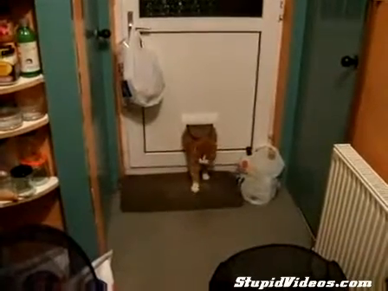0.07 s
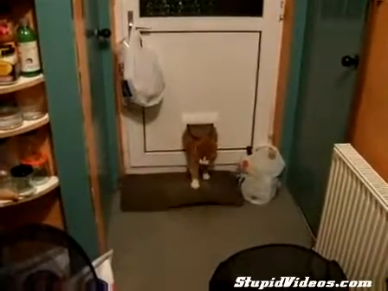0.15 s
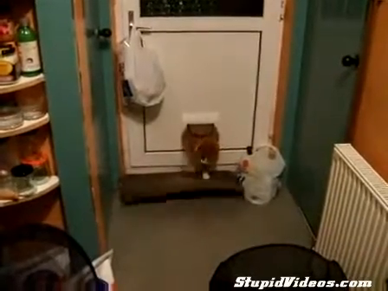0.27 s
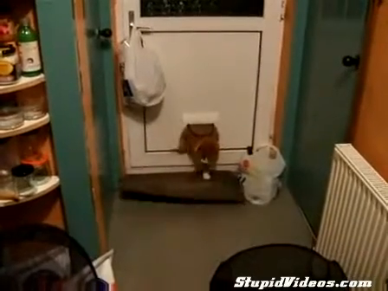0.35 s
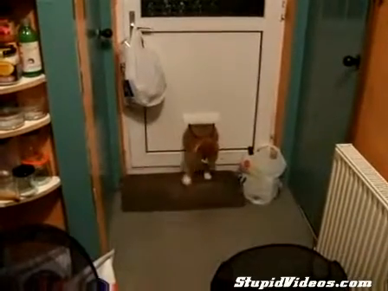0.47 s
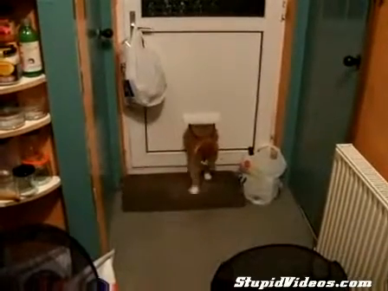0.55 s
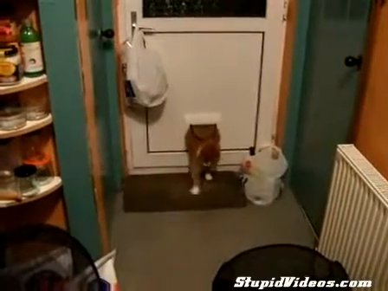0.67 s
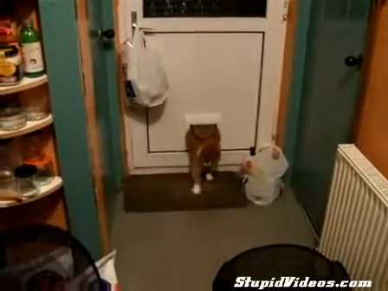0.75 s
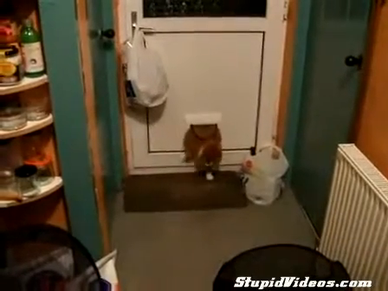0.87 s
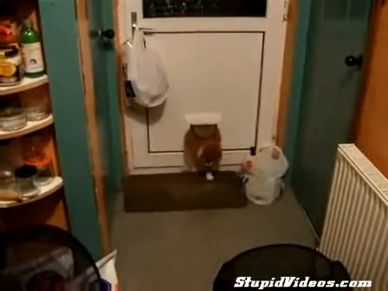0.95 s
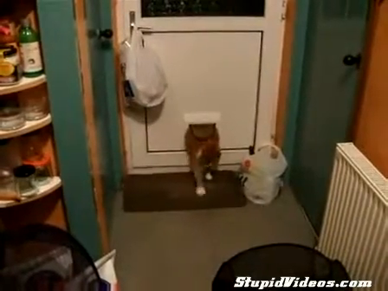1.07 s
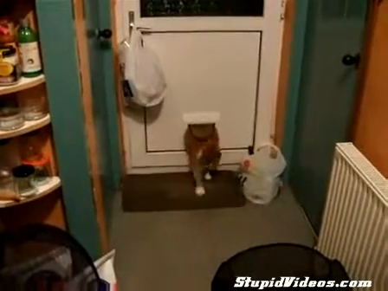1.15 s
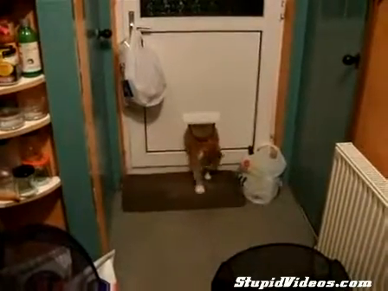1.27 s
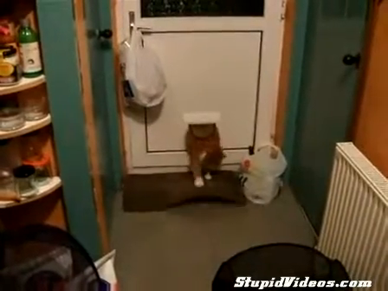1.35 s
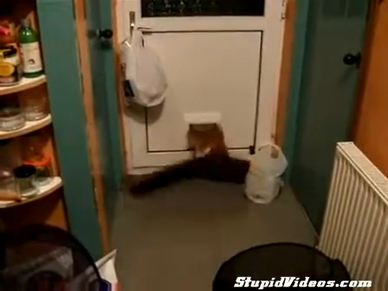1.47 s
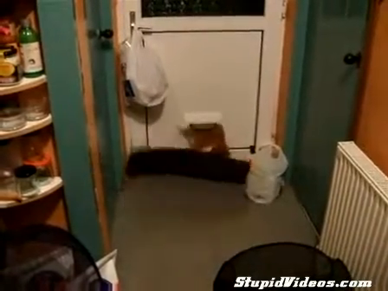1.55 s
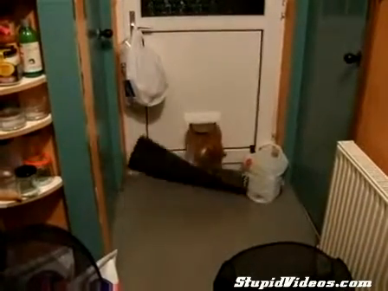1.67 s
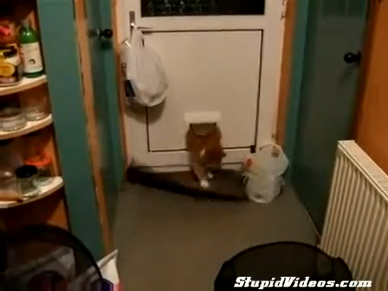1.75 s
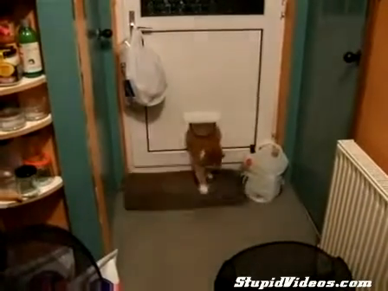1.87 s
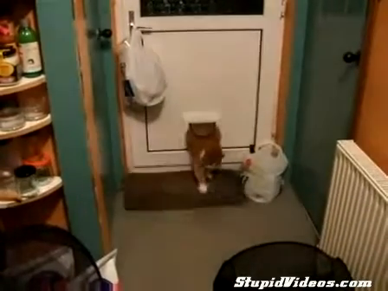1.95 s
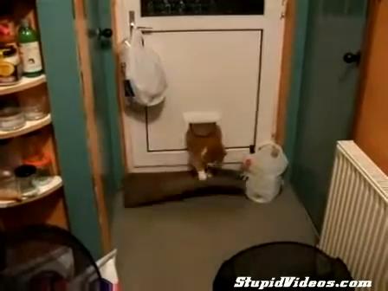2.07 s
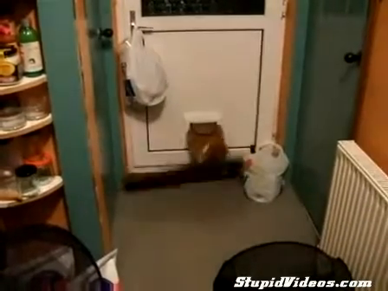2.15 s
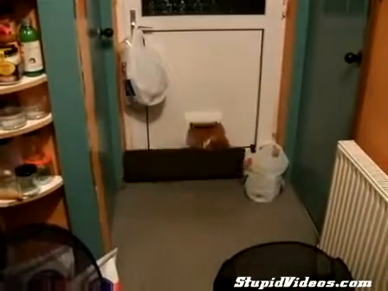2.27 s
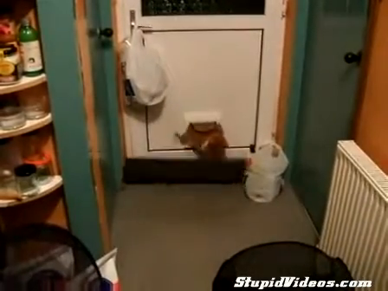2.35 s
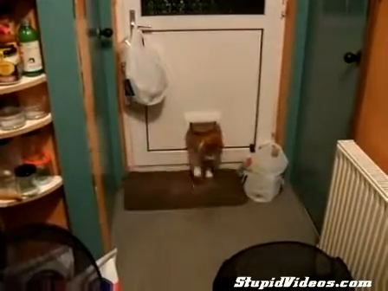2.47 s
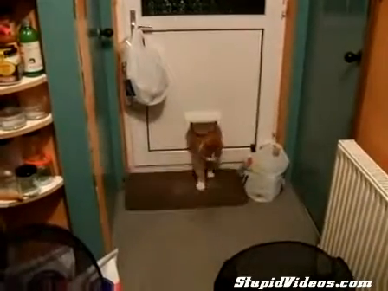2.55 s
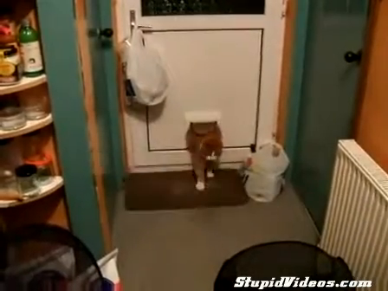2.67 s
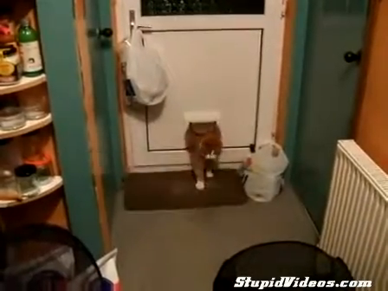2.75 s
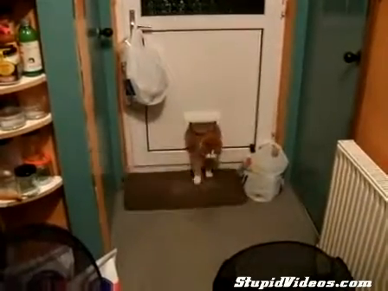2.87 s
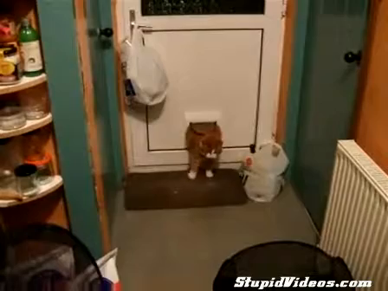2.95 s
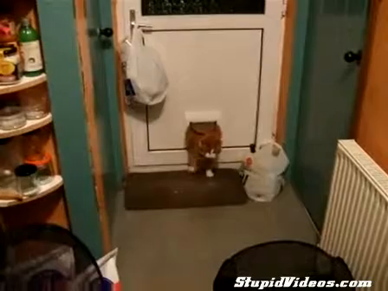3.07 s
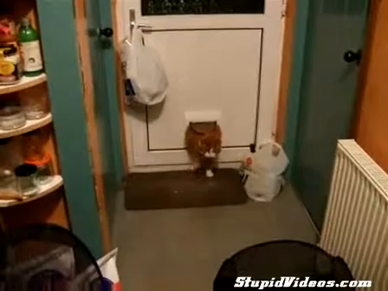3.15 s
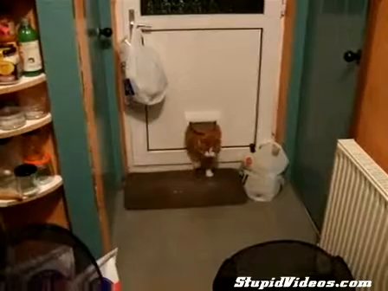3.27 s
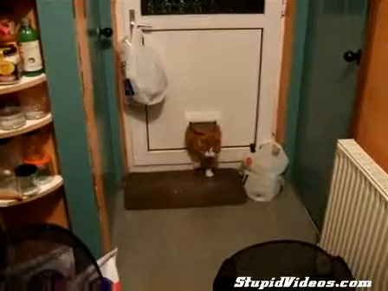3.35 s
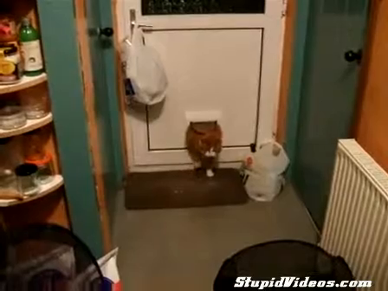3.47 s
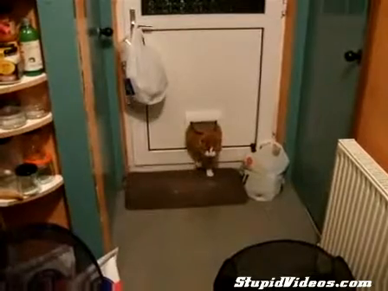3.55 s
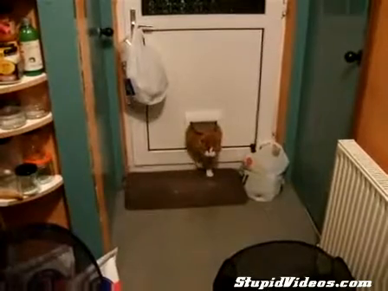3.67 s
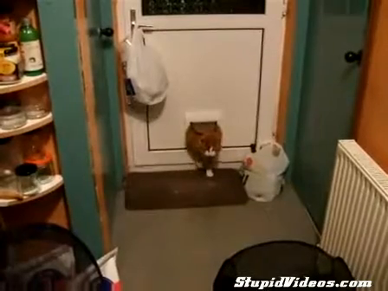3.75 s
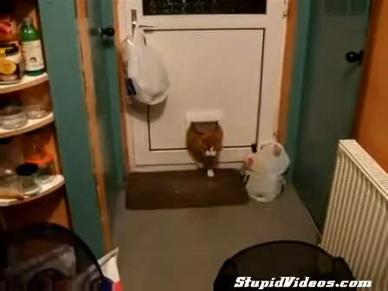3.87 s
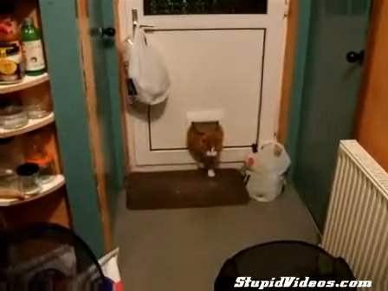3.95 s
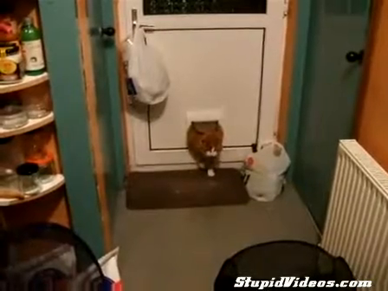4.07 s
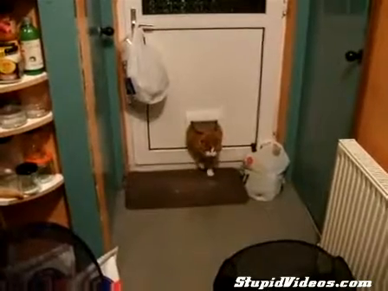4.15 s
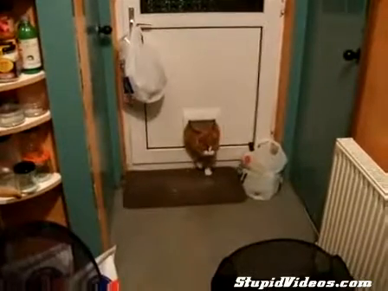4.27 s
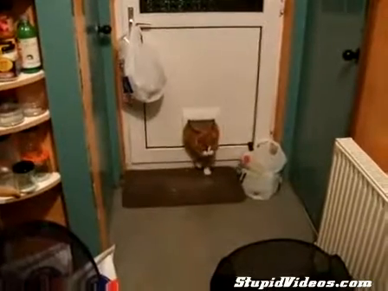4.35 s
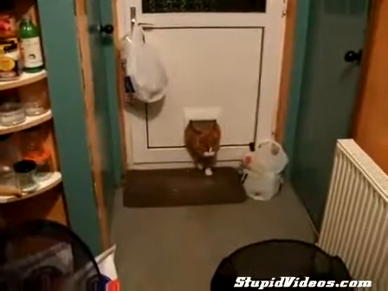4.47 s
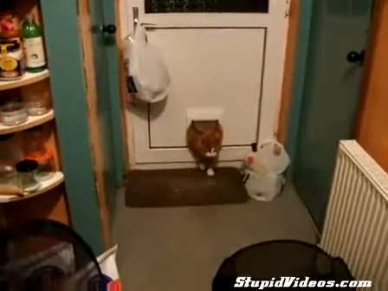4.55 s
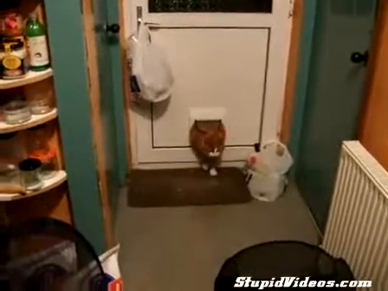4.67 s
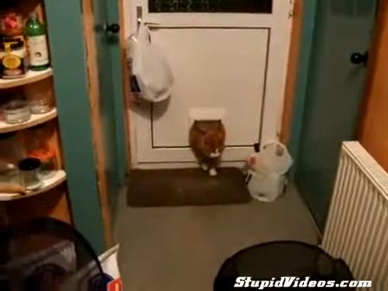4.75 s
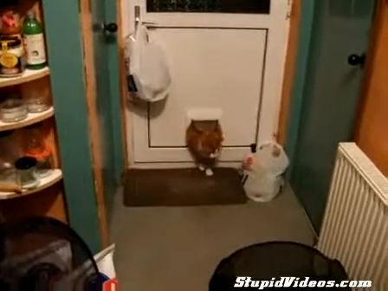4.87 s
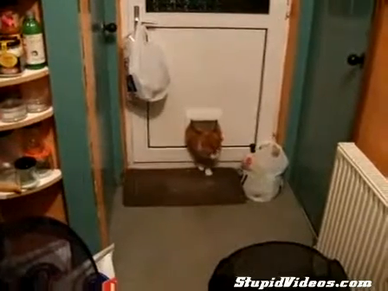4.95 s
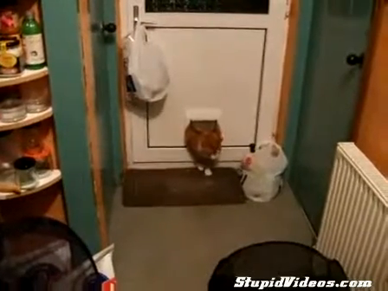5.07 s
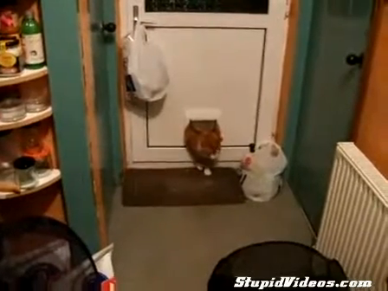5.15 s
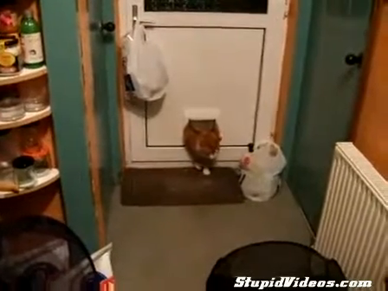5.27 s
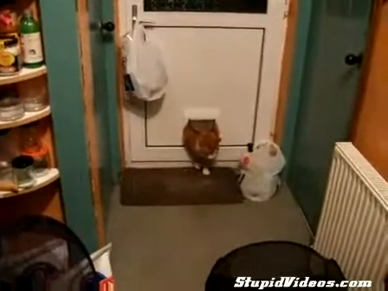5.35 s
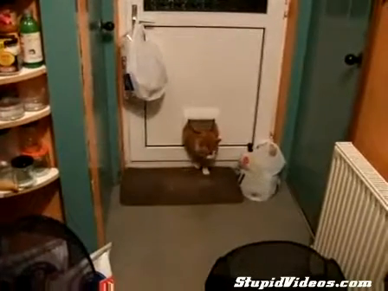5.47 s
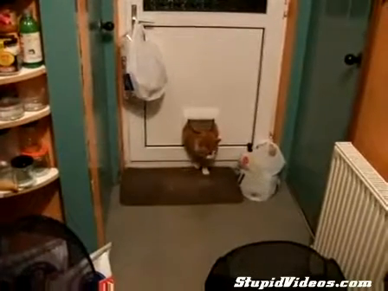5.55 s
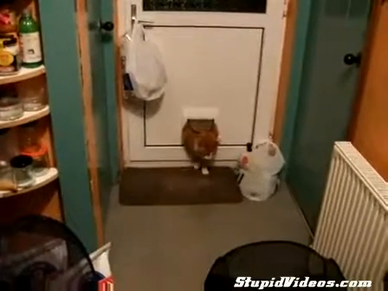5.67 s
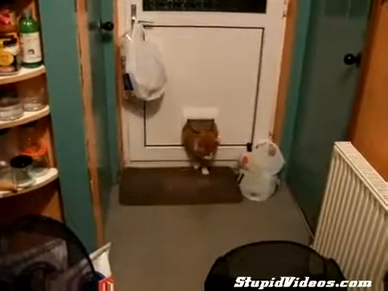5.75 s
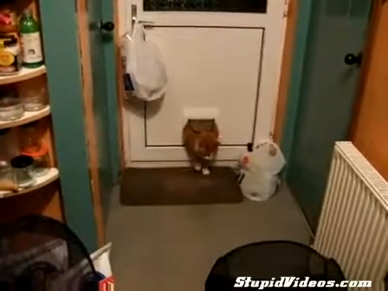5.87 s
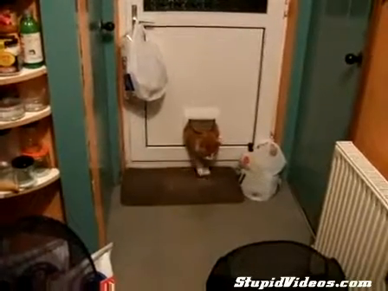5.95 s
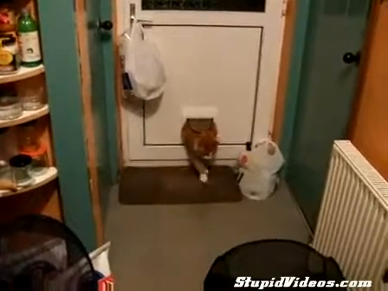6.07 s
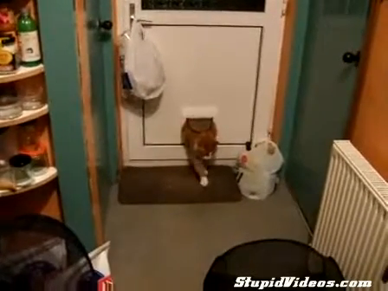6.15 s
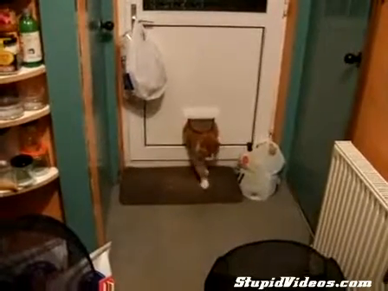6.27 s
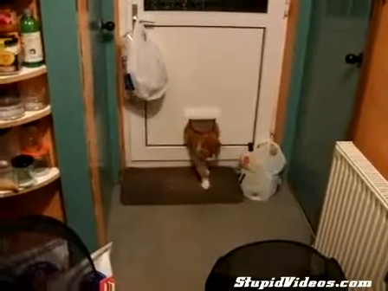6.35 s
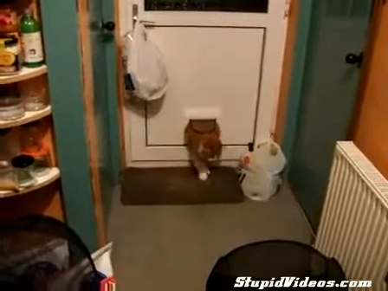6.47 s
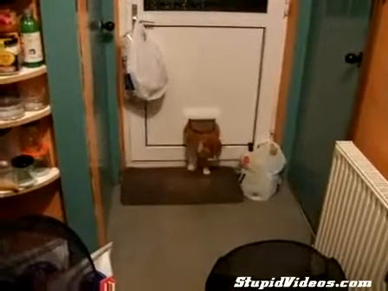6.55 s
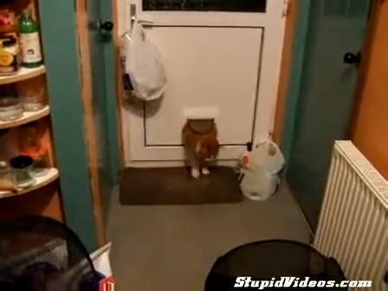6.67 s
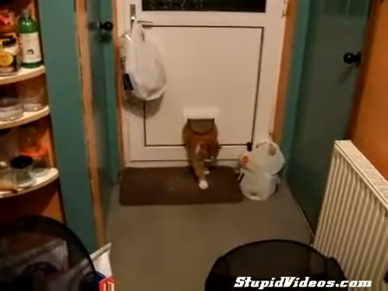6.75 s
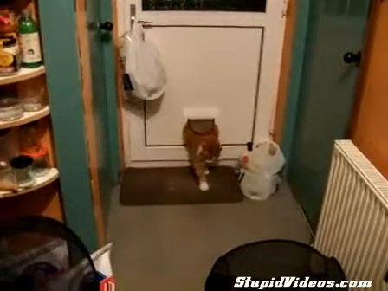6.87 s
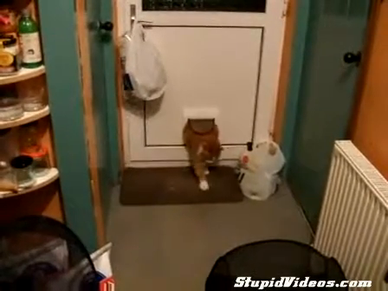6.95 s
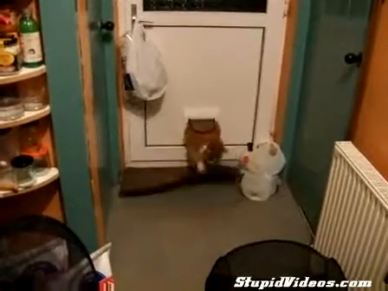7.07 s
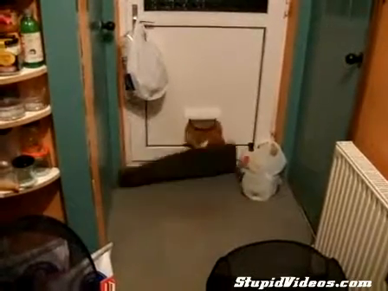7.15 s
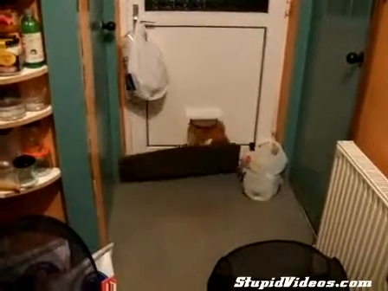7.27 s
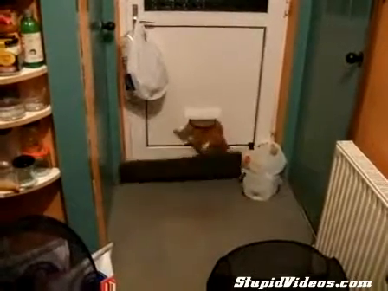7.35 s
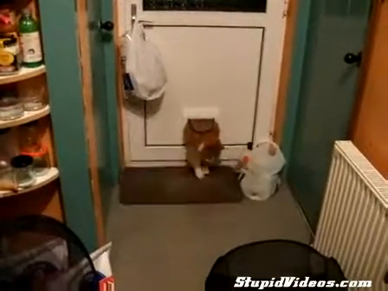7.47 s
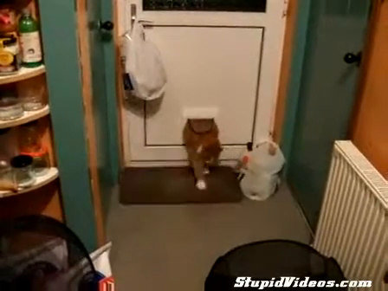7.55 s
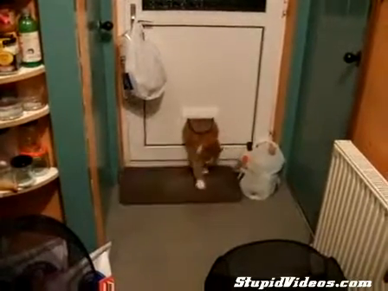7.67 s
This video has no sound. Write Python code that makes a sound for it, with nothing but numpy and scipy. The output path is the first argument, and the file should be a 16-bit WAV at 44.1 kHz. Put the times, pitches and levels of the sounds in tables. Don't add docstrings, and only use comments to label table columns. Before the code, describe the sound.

A cheap camera's soft hiss and low wavering hum run throughout, in a small hard hallway with a short ring. From 0.2 to 0.6 s a plastic flap clacks sharply against a hollow door, with jammed fur shoves and gritty mat scraping. Softer body thuds follow at 0.8 to 1.3 s. From 1.4 s the struggle thickens; a hard clack near 1.8 s sets loose metal jingling until a strong shove at 2.0 s. More clacks, bumps and bristly drags come at 2.2 to 2.7 s, the last ones loud, with tiny ticks near 2.9 s. Then a lull: a faint thud at 4.2 s, one thin falling mew to 4.8 s, and barely audible ticks. Two clacks at 6.6 s and dull thuds from 6.9 s restart it; dense knocks and scrapes from 7.2 s end with a very loud blow and high metallic buzz at 7.6 s.

```python
import sys
import numpy as np
from scipy import signal
from scipy.fft import rfft, irfft
from scipy.io import wavfile
from scipy.ndimage import uniform_filter1d

SR = 44100
rng = np.random.default_rng(int(sys.argv[2]) if len(sys.argv) > 2 else 0)


def magnitude_from_level(level_db):
    exponent = np.asarray(level_db, float) / 20
    return 10 ** exponent


def unload_audio(sound):
    columns = np.transpose(np.atleast_2d(sound))
    steps = np.round(np.clip(columns, -1, 1) * 32767)
    wavfile.write(sys.argv[1], SR, steps.astype(np.int16))


N = 340011
T = np.arange(N) / SR

# frequency in Hz, level in dB, t60 in s.
PANEL_MODES = [(240, -2, 0.02), (293.7, 0.5, 0.072), (354, 2, 0.035), (414, -1, 0.058), (476, -3.5, 0.0075),
               (528, -1.5, 0.048), (600, -1.5, 0.027), (680, -7.5, 0.02), (775, 4.5, 0.028),
               (857, 1.5, 0.034), (913, 5, 0.025), (1056, 3, 0.041), (1223, -6.5, 0.056),
               (1308, 0.5, 0.027), (1440, -3.5, 0.023), (1694, 7, 0.011), (1890, -18.5, 0.019),
               (1960, -0.5, 0.006), (2440, -4.5, 0.017)]
# frequency in Hz, level in dB, t60 in s.
DOOR_MODES = [(58.5, -10, 0.052), (77, -7.5, 0.069), (96.4, -0.5, 0.18), (109, -13.5, 0.03),
              (146.5, 4.5, 0.14), (173, 3, 0.23), (210, 3.5, 0.094), (235, -13, .03)]


def clacks():
    # start in s, panel peak in dB, panel pitch in Hz, crack over panel in dB.
    clack_rows = [(0.202, -26.5, 833, -1.5), (0.304, -39, 519, -5), (0.342, -18, 408, -3),
                  (0.506, -16.5, 796, -7.5), (0.605, -20, 744, 13.5), (1.403, -33, 820, -5.5),
                  (1.469, -19, 528, -11), (1.817, -10, 775, 4), (2.217, -29.5, 528, -2),
                  (2.397, -17.5, 272, -32), (2.419, -13, 313, -5.5), (2.64, -10.5, 585, -4.5),
                  (2.903, -39.5, 830, 1.5), (2.977, -35.5, 726, -0.3), (6.599, -21, 650, -5.5),
                  (6.623, -18.5, 600, -4), (7.185, -29.5, 545, -0.5), (7.443, -10, 346, -5.5)]
    thump_db, contact_ms = -37.5, 3.33
    blows = [(*row, thump_db, contact_ms) for row in clack_rows]
    return knocks(blows, rise=1.0, early_s=0.001215)


def thuds():
    # start in s, panel peak in dB, panel pitch in Hz, crack over panel in dB,
    # door thump over panel in dB.
    thud_rows = [(0.773, -29, 348, -2, -1.5), (1.039, -25.5, 1260, -2, -12), (1.157, -38, 388, -24, -1),
                 (1.188, -19.5, 399, -6, -2.5), (1.256, -28, 330, -5, -5.5), (1.732, -23.5, 430, -14, 4),
                 (1.759, -20, 297, -26, 2.5), (1.785, -19.5, 322, -29, -19), (2.273, -30, 315, 0.5, -16),
                 (2.303, -35, 900, 1.5, -11), (4.215, -38.5, 330, -28, -13), (6.859, -23, 336, -14, -10.5),
                 (6.938, -26.5, 350, -8, -3), (7.108, -36, 830, -11, -18), (7.287, -16.5, 330, -36, -3.5),
                 (7.538, -16.5, 338, -8, -8.5), (7.636, -9.5, 514, -0.5, -16)]
    contact_ms = 4.4
    blows = [(*row, contact_ms) for row in thud_rows]
    return knocks(blows, rise=0.56, early_s=0.001202)


def shoves():
    # start in s, panel peak in dB, panel pitch in Hz, crack over panel in dB, contact in ms.
    shove_rows = [(0.365, -26.5, 397, -30, 7), (0.403, -22, 405, -2.5, 12), (0.557, -20.5, 543, -2.5, 11),
                  (0.921, -24, 624, -1.5, 16.5), (1.555, -31.5, 302, 3, 4.2), (1.672, -17.5, 326, -0.5, 7),
                  (1.693, -15.5, 920, -1, 6.1), (1.989, -11, 1143, 3.5, 6.3), (2.337, -24, 306, -24, 5.2),
                  (2.479, -18, 1050, -6.5, 3.5), (2.615, -27, 370, 1.5, 8.2), (2.651, -12.5, 1090, 3, 4.5),
                  (7.234, -19.5, 905, -4.5, 7.3), (7.265, -18.5, 363, -26, 7.6), (7.351, -27, 365, 4, 8.7)]
    thump_db = -15
    blows = [(*row, thump_db, contact_ms) for *row, contact_ms in shove_rows]
    return knocks(blows, rise=2.0, early_s=0.004)


def knocks(blows, rise, early_s):
    # frequency in Hz, density in dB per Hz.
    crack_points = [(590, -25.5), (1000, -10.5), (1110, -1.5), (2090, -4.5), (2800, -3.5), (4870, -4.5),
                    (7320, -7.5), (8890, -14.5), (10200, -61.5), (13200, -74), (22000, -120)]
    snap = shape(crack_points)[:512]
    out = np.zeros(N)
    octaves = np.log2(np.transpose(PANEL_MODES)[0])
    for s, db, hz, crack_db, thump_db, ms in blows:
        force = chatter(SR // 6, 12000, ms, rise)
        push = np.abs(force)

        near = np.exp(-((octaves - np.log2(hz)) / 1.4) ** 2)
        near = near * rng.choice([-1, 1], len(PANEL_MODES))
        panel = peak(ring(push, hz, 19 / hz), 2.4) + peak(body(force, PANEL_MODES, near), 0)
        thin = signal.butter(2, max(0.53 * hz, 220), "high", fs=SR)
        panel = signal.lfilter(*thin, panel)

        soft_hz = np.clip(12000 * magnitude_from_level(2.0 * crack_db), 2500, 15000)
        crack = signal.fftconvolve(force, snap)[:len(force)]
        crack = signal.lfilter(*signal.butter(2, soft_hz, fs=SR), crack)

        door = body(push, DOOR_MODES, rng.choice([-1, 1], len(DOOR_MODES)))
        blow = peak(panel, db - 1) + peak(crack, db + crack_db + 0.5) + peak(door, db + thump_db + 2.5)
        add(out, s - early_s, blow)
    return out


def metal():
    # frequency in Hz, level in dB, t60 in s.
    fitting_modes = [(854, 6, 0.036), (1397, -0.5, .04), (1910, -7, 0.055), (2315, 8, 0.098),
                     (2370, 5, 0.052), (3250, 2.5, 0.11), (4270, 0.5, 0.11), (5120, -2, .045),
                     (5190, 2.5, .1), (5710, 0.5, 0.084), (6370, -14, .045), (7200, -13, .05),
                     (8600, -33, .04)]
    # start in s, peak in dB, rattling in ms, caught at s.
    jingle_rows = [
        (1.822, -14, 44, 1.97),
    ]
    # start in s, peak in dB,
    # frequency in Hz, buzzing in ms.
    ping_rows = [
        (0.507, -29.5, 4390, 15),
        (2.334, -35.5, 7400, 12),
        (2.638, -24.5, 7250, 6.3),
        (7.238, -25.5, 7420, 11),
        (7.646, -21.5, 7470, 19),
        (4.784, -38, 1090, 2.7),
        (4.815, -56, 1110, 8),
    ]
    out = np.zeros(N)
    for s, db, ms, caught_s in jingle_rows:
        rattle = body(chatter(SR // 4, 2500, ms, rise=0.4), fitting_modes)
        held = np.clip((caught_s - s - T[:len(rattle)]) / 0.02, 0, 1)
        add(out, s, peak(rattle, db) * held)
    for s, db, hz, ms in ping_rows:
        buzz = ring(chatter(SR // 4, 3300, ms, rise=0.04), hz, 0.044)
        add(out, s, peak(buzz, db))
    return out


def drags():
    # frequency in Hz, density in dB per Hz.
    bristle_points = [(710, -34.5), (1200, 0.5), (1460, -1.5), (1600, -7), (2410, 1.5), (3070, -2),
                      (7320, 0.5), (8910, -8.5), (10200, -36), (13200, -62.5), (22000, -120)]
    # fastest at s, hiss in dB, swell in ms per 20 dB,
    # fade in ms per 20 dB, weight in dB.
    stroke_rows = [(0.345, -35, 26, 303, -6), (0.409, -31, 86, 132, -6.5), (0.518, -31.5, 95, 94, -1.5),
                   (0.604, -26.5, 8, 100, 6), (1.472, -37, 14, 82, -17), (1.572, -30.5, 72, 325, 0),
                   (1.76, -40, 393, 298, 11.5), (1.819, -24, 25, 131, -13), (1.988, -24.5, 36, 94, 4.5),
                   (2.22, -35, 52, 500, -0.5), (2.342, -29.5, 102, 137, 0.5), (2.424, -30, 44, 373, -1),
                   (2.65, -21, 59, 67.5, 4.5), (2.82, -48, 100, 58, 4), (6.629, -32.5, 39, 15, -2),
                   (7.239, -22.5, 63, 132, -9.5), (7.351, -27, 45, 64, 2), (7.49, -31.5, 291, 600, 2.5),
                   (7.646, -22.5, 70, 71, 1.5)]
    panel_rub_db, door_rub_db = -4, -15.5
    linger = 1.16

    catch = unit(smooth(rng.standard_normal(N), 500, 200))
    slips = grains(N, 9000, 2.5) * magnitude_from_level(1.78 * catch)
    hiss, rumble = np.zeros(N), np.zeros(N)
    for s, db, swell_ms, fade_ms, weight_db in stroke_rows:
        rising_db = 20000 * (s - T) / swell_ms
        falling_db = 20000 * (T - s) / fade_ms
        hiss = np.maximum(hiss, magnitude_from_level(db - np.maximum(rising_db, falling_db)))
        rumble_db = db + weight_db - np.maximum(rising_db, falling_db / linger)
        rumble = np.maximum(rumble, magnitude_from_level(rumble_db))
    shaken = magnitude_from_level(panel_rub_db) * unit(body(slips, PANEL_MODES))
    shaken = shaken + magnitude_from_level(door_rub_db) * unit(body(slips, DOOR_MODES))
    return magnitude_from_level(-3.0) * (hiss * unit(colour(slips, bristle_points)) + rumble * shaken)


def mew():
    # time in s, pitch in Hz, level in dB, mouth opening 0-1.
    mew_rows = [
        (4.241, 819, -63, 0),
        (4.306, 738, -55.5, 0.04),
        (4.363, 693, -54.5, 0.77),
        (4.428, 674, -59, 0.6),
        (4.508, 653, -53.5, 0.92),
        (4.6, 649, -56, 0.75),
        (4.69, 642, -56.5, 0.41),
        (4.75, 617, -51, 0),
        (4.775, 637, -67, 0.15),
    ]
    throat_levels = [0.2, 1.7, -4.5, -7, -25, -2]
    shut_hz, open_octaves, width_octaves, mouth_db = 1190, 1.35, 0.28, 10
    shut_db_per_partial, waver_depth_db = 1.3, 2.5

    s, *columns = np.transpose(mew_rows)
    hz, db, opening = (np.interp(T, s, c) for c in columns)
    flutter = unit(smooth(rng.standard_normal(N), 300))
    phase = 2 * np.pi * np.cumsum(hz * (1 + 0.0033 * flutter)) / SR
    mouth = np.log2(shut_hz) + open_octaves * opening
    voice = 0
    for k, throat_db in enumerate(throat_levels):
        lift_db = mouth_db * np.exp(-((np.log2((k + 1) * hz) - mouth) / width_octaves) ** 2)
        lift_db = lift_db - shut_db_per_partial * k * k * (1 - opening)
        waver_db = waver_depth_db * unit(smooth(rng.standard_normal(N), 900, 600))
        voice = voice + magnitude_from_level(db + throat_db + lift_db + waver_db + 4.0) * np.sin((k + 1) * phase)
    return voice * np.clip(np.minimum(T - s[0], s[-1] - T) / 0.014, 0, 1)


def hall(x, wet_db):
    # centre in Hz, level in dB, t60 in s.
    echo_bands = [(118, -5, 0.48), (530, 4, 0.22), (2020, 4, 0.27), (7400, 0.5, 0.23)]
    t, tail = T[:SR // 2], 0
    for k, (hz, db, t60) in enumerate(echo_bands):
        edges_hz = [hz / 2 if k else 20, min(hz * 2, 15000)]
        band_pass = signal.butter(2, edges_hz, "band", fs=SR, output="sos")
        band = signal.sosfilt(band_pass, rng.standard_normal(len(t)))
        tail = tail + band * magnitude_from_level(db - 60 * t / t60)
    tail = tail * np.clip((t - 0.003) / 0.0035, 0, 1)
    return x + magnitude_from_level(wet_db) * signal.fftconvolve(x, tail / np.sqrt(np.sum(tail ** 2)))[:N]


def camera():
    # frequency in Hz, density in dB per Hz.
    hiss_points = [(12, -41), (20, 6.5), (22, -2), (54, -9), (70, -13.5), (112, -5.5), (149, -9),
                   (301, -10), (391, -8), (423, -7), (594, -13.5), (812, -12), (1600, -18), (7850, -21),
                   (10200, -48.5), (13200, -86.5), (22000, -120)]
    # frequency in Hz, level in dB rms.
    hum_lines = [(113.0, -71), (312.2, -66.5), (419.9, -61), (786.0, -76), (7860, -103.5), (7887, -88),
                 (8113, -77), (8140, -79.5)]
    out = unit(colour(rng.standard_normal(N), hiss_points)) * magnitude_from_level(-52)
    for hz, db in hum_lines:
        waver = unit(smooth(rng.standard_normal(N), 3000))
        out += np.sqrt(2) * magnitude_from_level(db + 0.65 * waver) * np.sin(2 * np.pi * hz * T + 0.1 * waver)
    return out


def chatter(size, rate, ms, rise):
    t = (T[:size] + 1 / SR) / (max(ms, 0.5) / 1000)
    return grains(size, rate, 2.12) * (1 - np.exp(-t / rise)) * np.exp(-t)


def grains(size, rate, spread_db):
    u = rng.random((3, size))
    hit = u[0] < rate / SR
    return hit * np.sign(u[1] - 0.5) * magnitude_from_level(-spread_db * np.log(1 - u[2]))


def body(x, modes, gains=1):
    hz, db, t60 = np.transpose(modes)[:, :, None]
    t = T[:int(np.max(t60) * SR)]
    decays = np.sin(2 * np.pi * hz * t) * magnitude_from_level(-60 * t / t60)
    response = (gains * magnitude_from_level(db[:, 0])) @ decays
    return signal.oaconvolve(x, response)[:len(x)]


def ring(x, hz, t60):
    return body(x, [(hz, 0, max(t60, 0.005))])


def shape(points):
    hz, db = np.transpose(points)
    bins_hz = np.maximum(np.fft.rfftfreq(4096, 1 / SR), 1)
    cep = irfft(np.interp(np.log(bins_hz), np.log(hz), db) * np.log(10) / 20)
    cep[1:2048] = 2 * cep[1:2048]
    cep[2049:] = 0
    return irfft(np.exp(rfft(cep)))


def colour(x, points):
    return signal.fftconvolve(x, shape(points))[:len(x)]


def smooth(x, *sizes):
    for size in sizes:
        x = uniform_filter1d(x, size)
    return x


def unit(x):
    return x / np.sqrt(np.mean(x ** 2))


def peak(x, db):
    return x * magnitude_from_level(db) / np.abs(x).max()


def add(out, s, x):
    i = int(s * SR)
    out[i:i + len(x)] += x[:len(out) - i]


def scene():
    parts = [clacks(), thuds(), shoves(), metal(), drags()]
    near = sum(hall(part, wet_db=-5) for part in parts)
    near = signal.sosfilt(signal.butter(3, 60, "high", fs=SR, output="sos"), near)
    return (near + hall(mew(), wet_db=-13) + camera())[None]


def roll_off(x):
    return signal.sosfilt(signal.butter(12, 10340, fs=SR, output="sos"), x)


def record(dry):
    offset = -0.0021 + magnitude_from_level(-63) * unit(smooth(rng.standard_normal(N), 1200))
    top_cut = signal.ellip(8, 0.2, 80, 10250, fs=SR, output="sos")
    mix = signal.sosfilt(top_cut, dry) + offset
    return roll_off(mix)


dry = scene()
out = record(dry)
unload_audio(out)
```